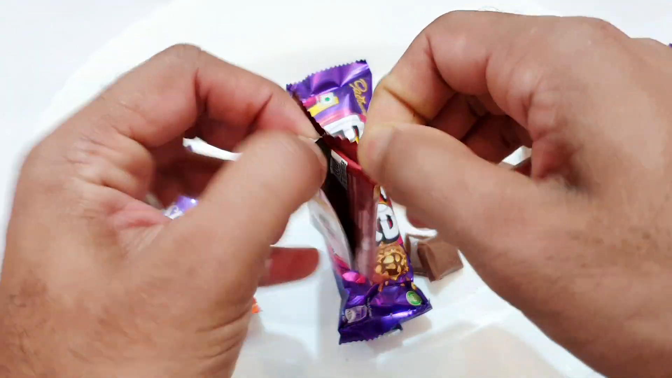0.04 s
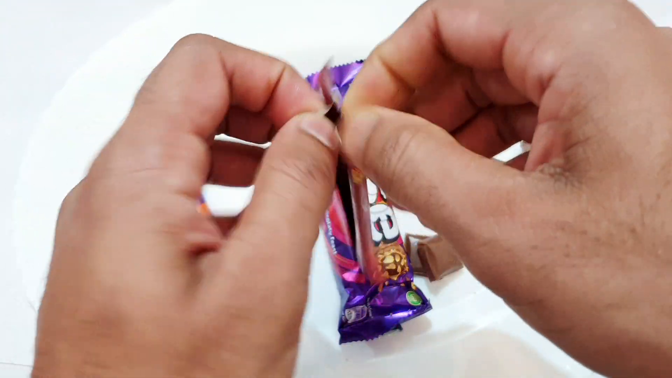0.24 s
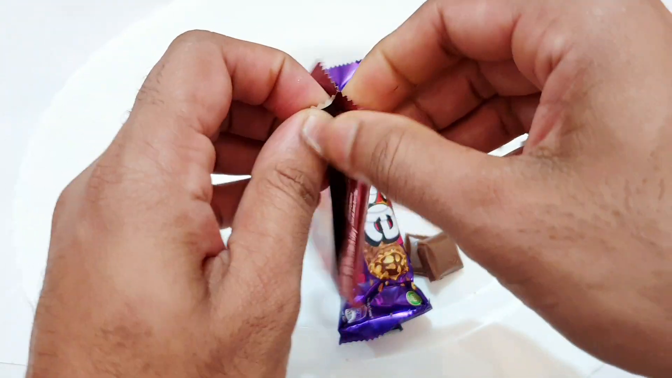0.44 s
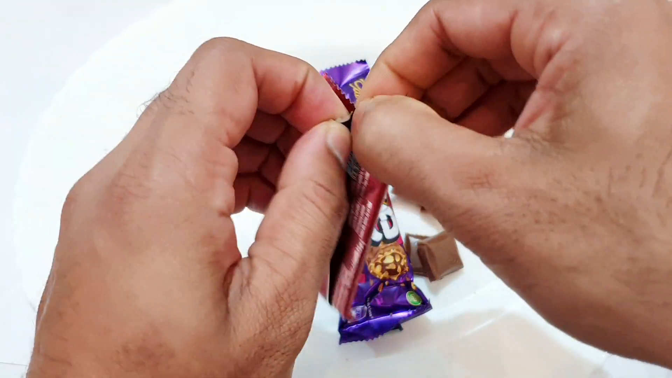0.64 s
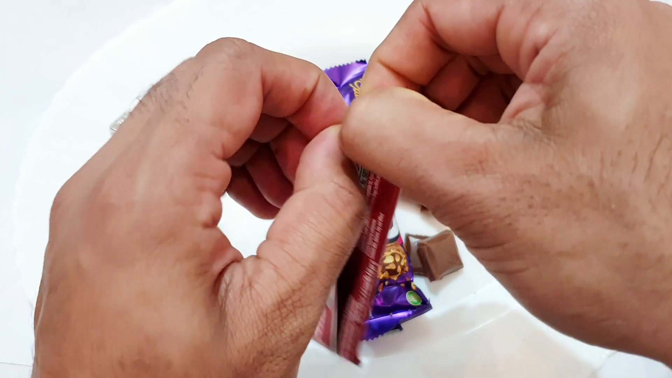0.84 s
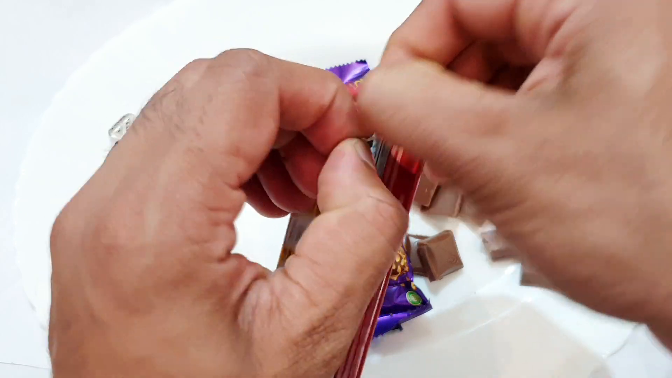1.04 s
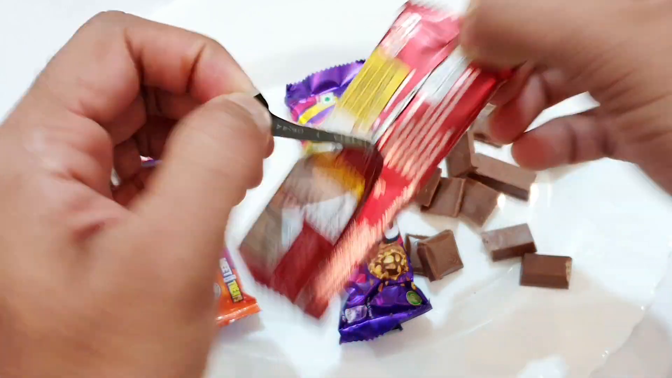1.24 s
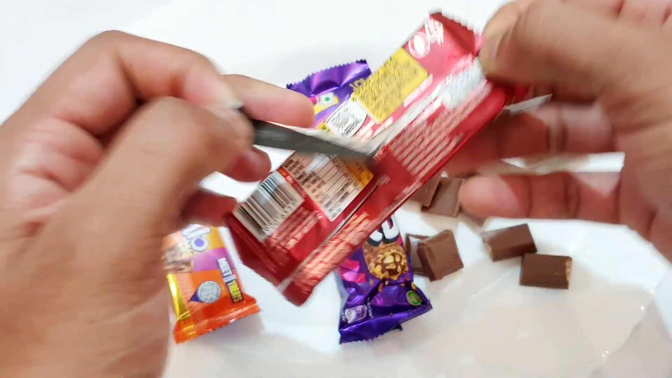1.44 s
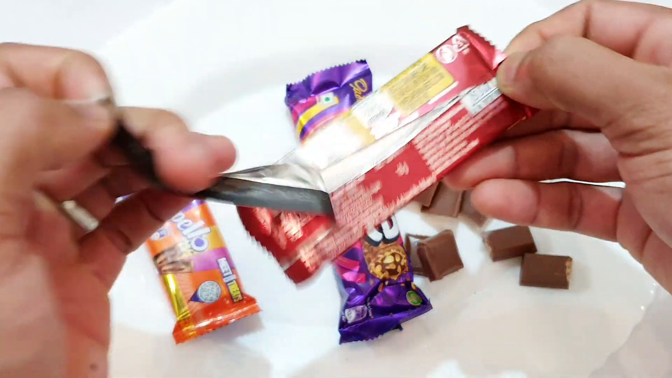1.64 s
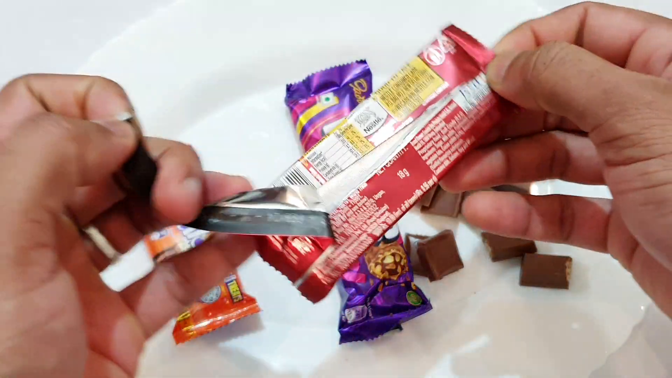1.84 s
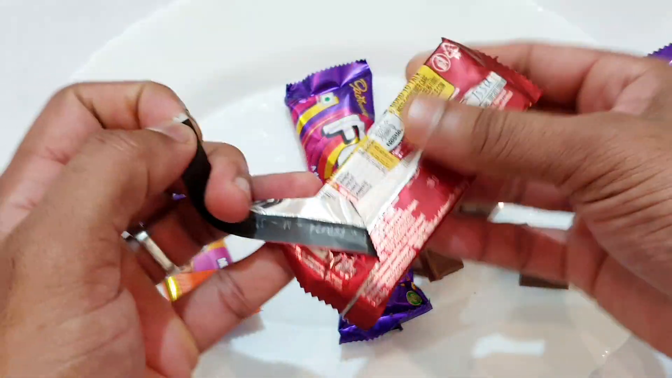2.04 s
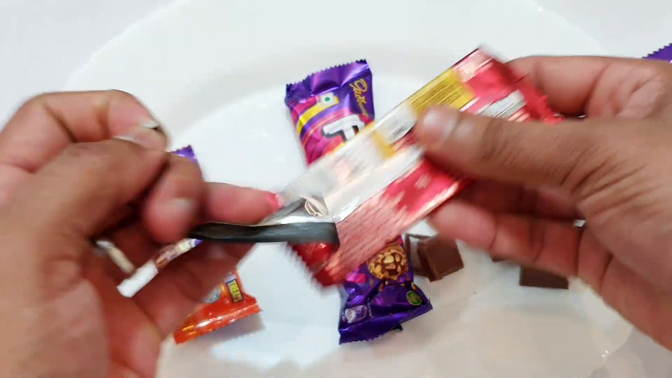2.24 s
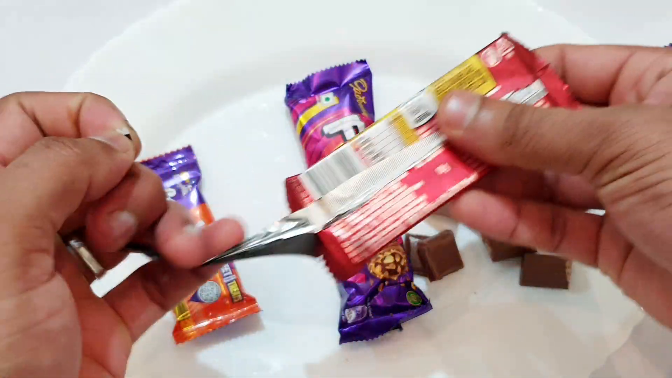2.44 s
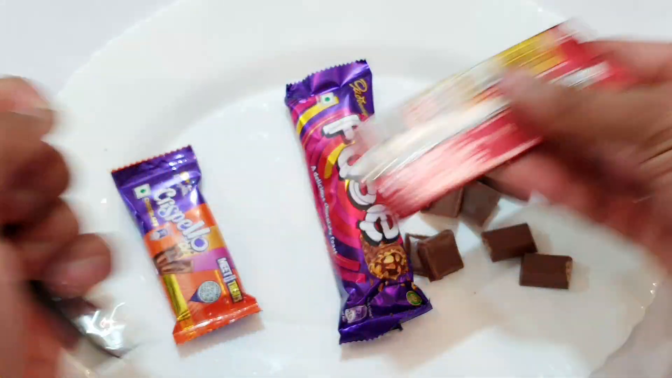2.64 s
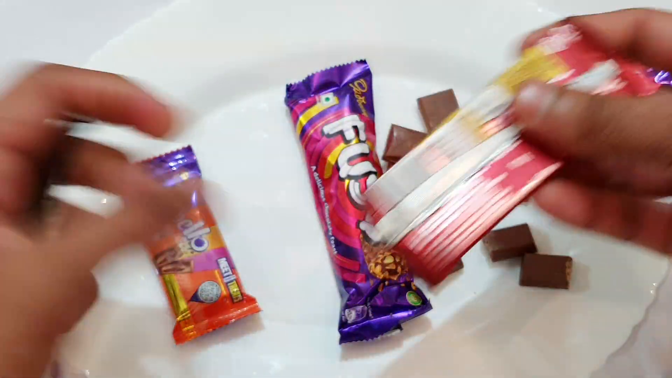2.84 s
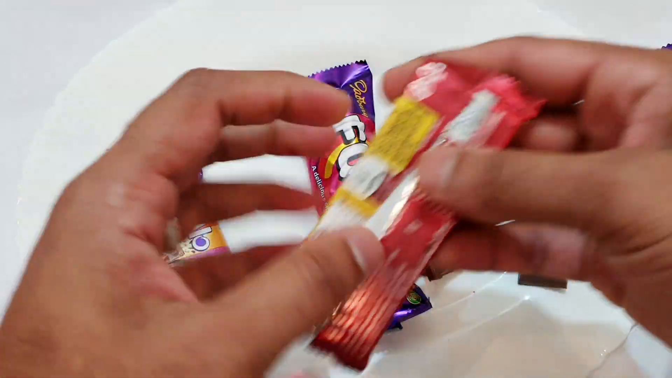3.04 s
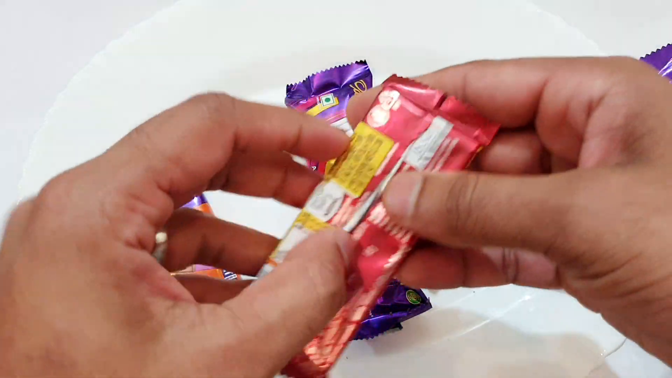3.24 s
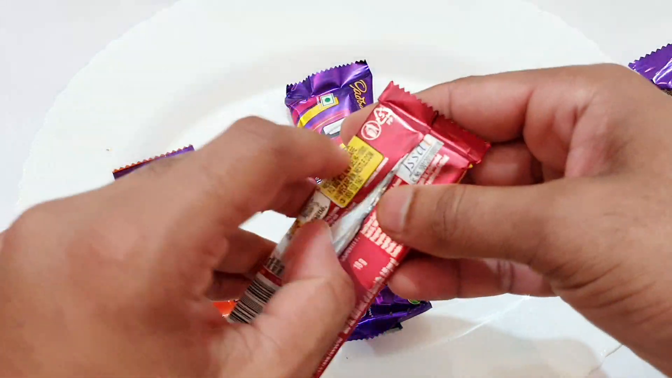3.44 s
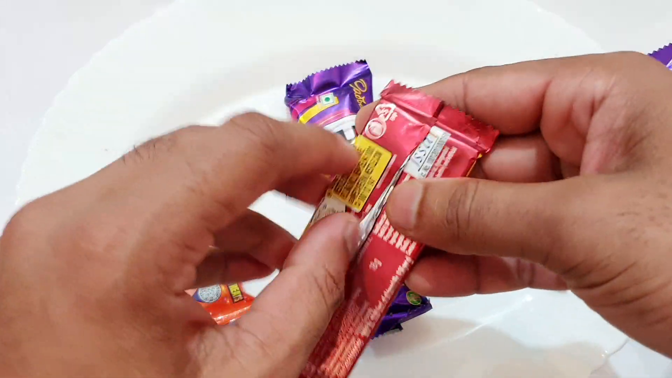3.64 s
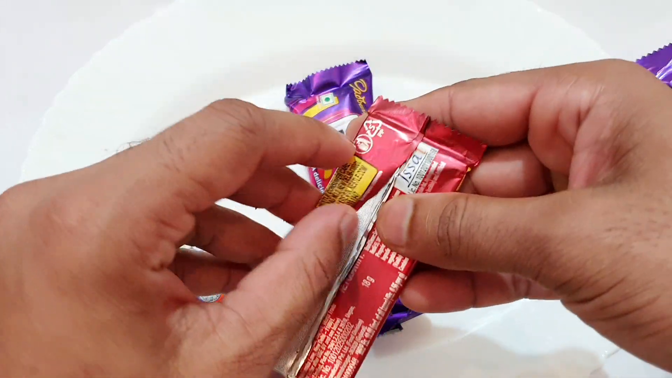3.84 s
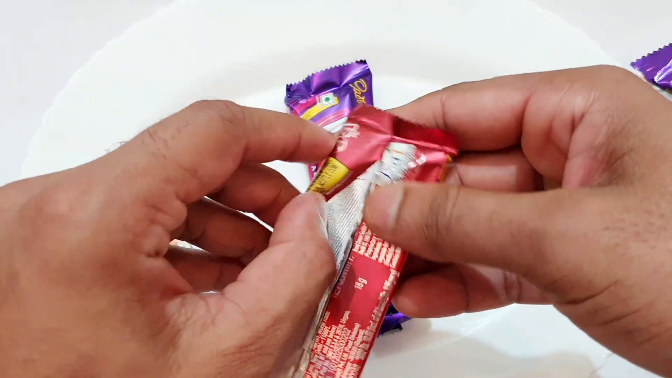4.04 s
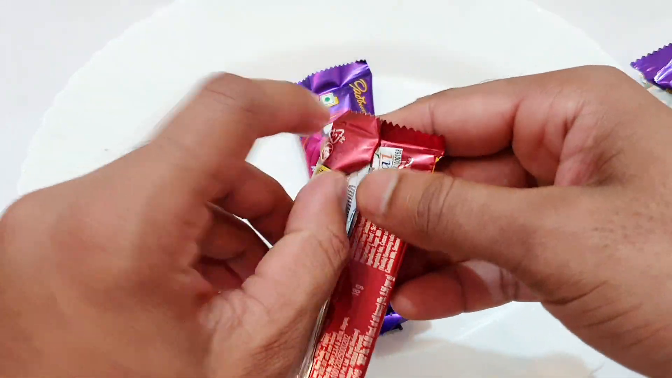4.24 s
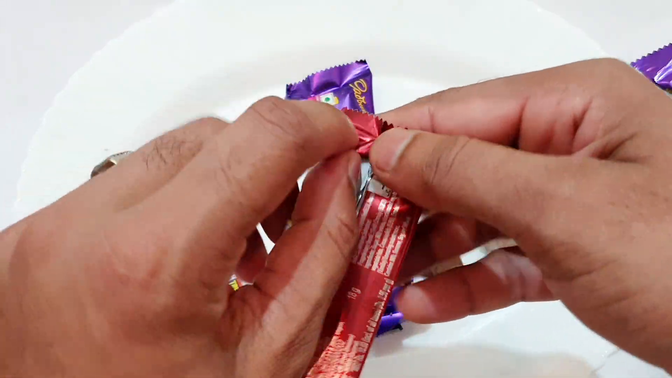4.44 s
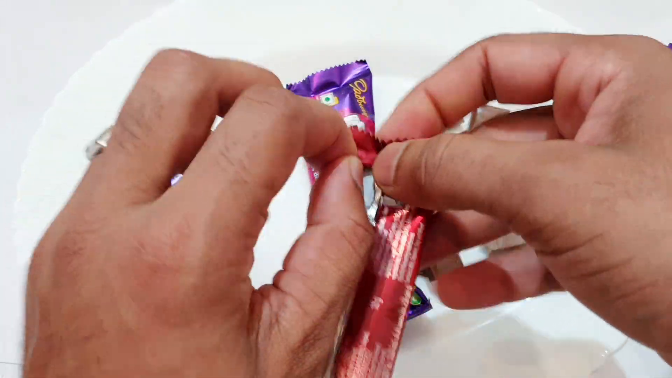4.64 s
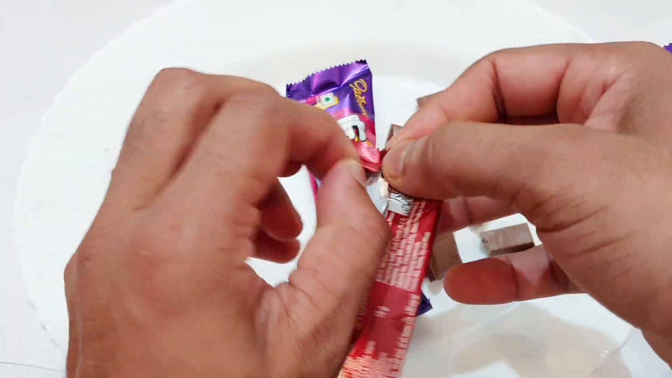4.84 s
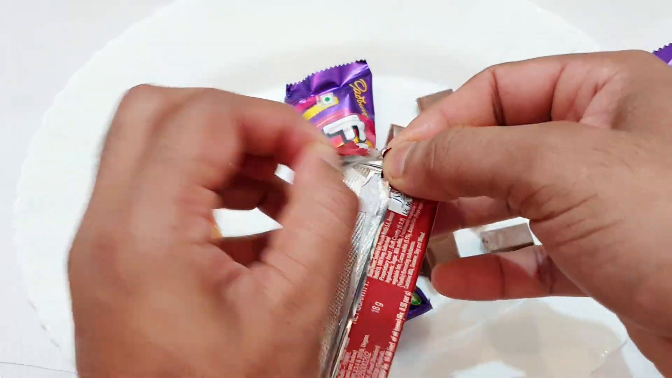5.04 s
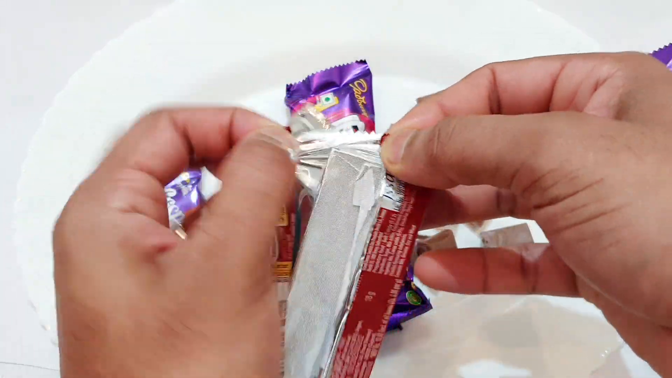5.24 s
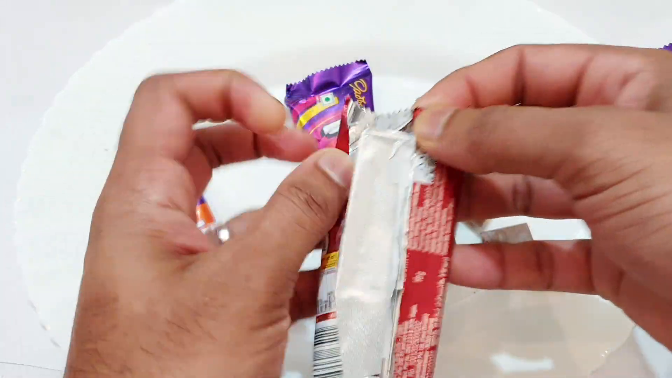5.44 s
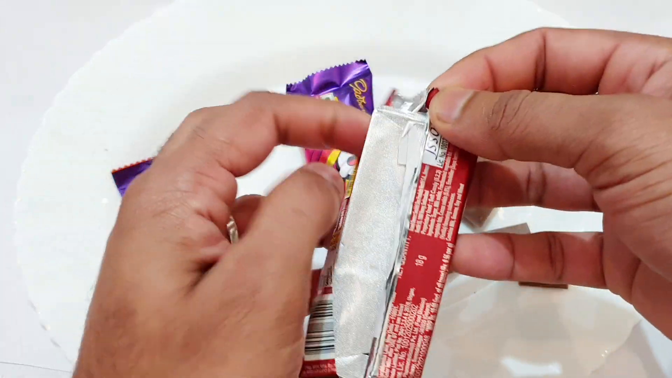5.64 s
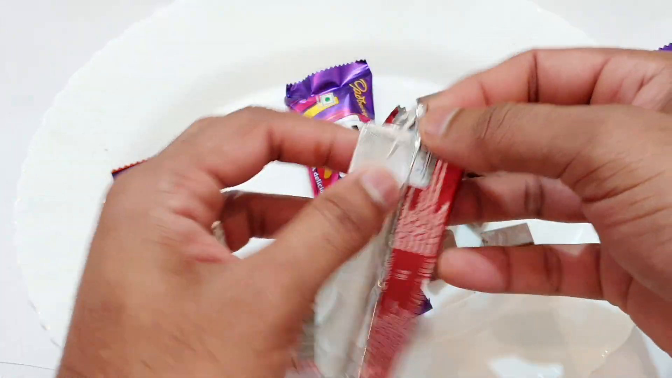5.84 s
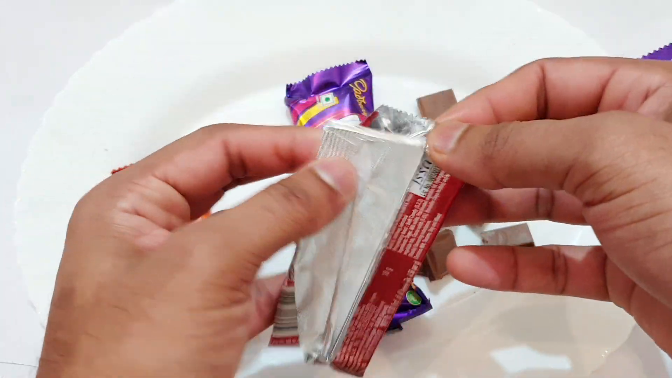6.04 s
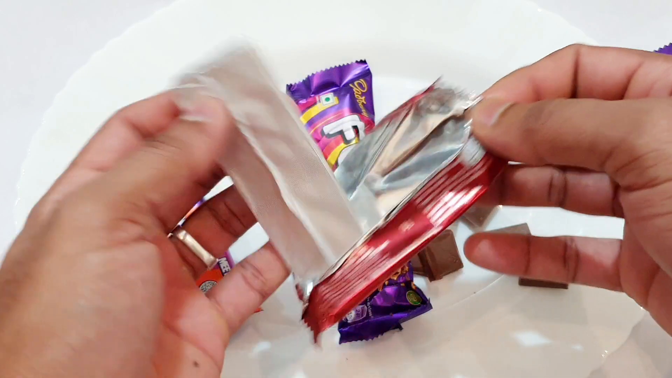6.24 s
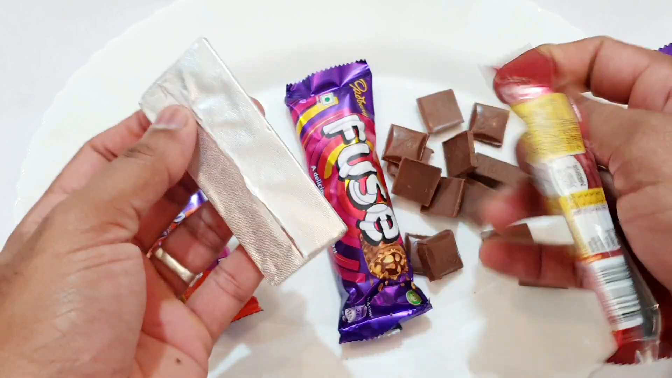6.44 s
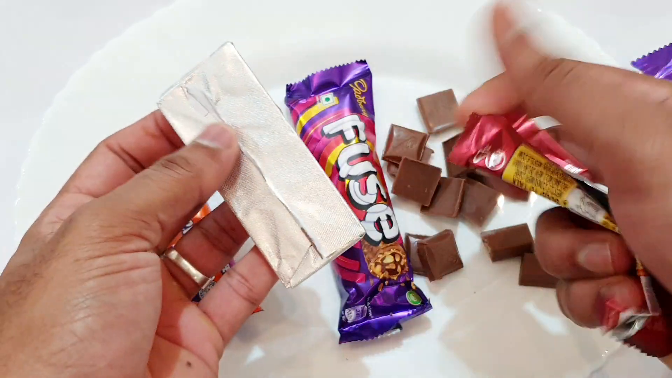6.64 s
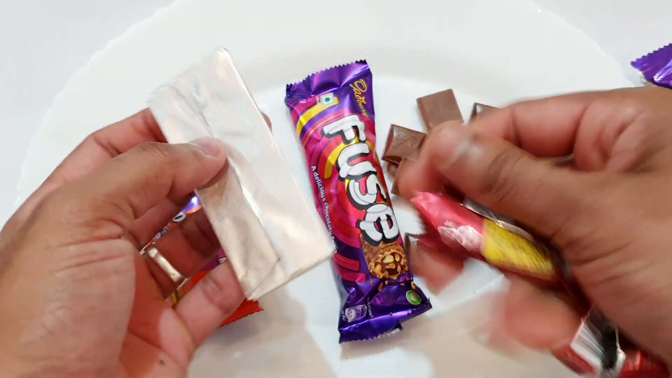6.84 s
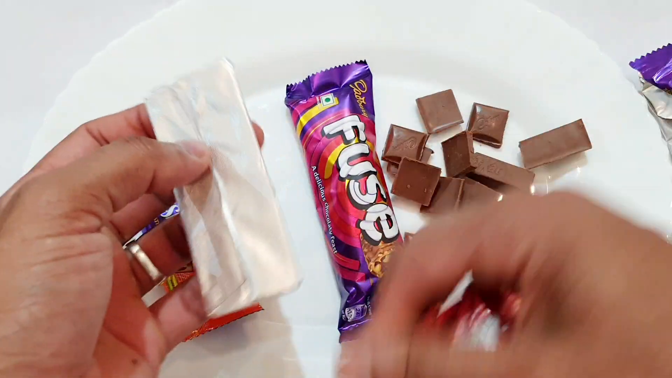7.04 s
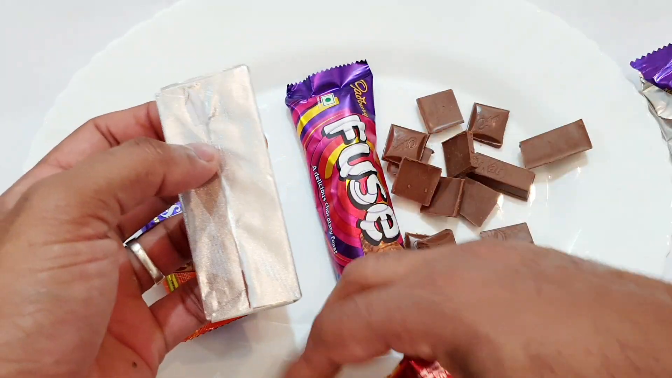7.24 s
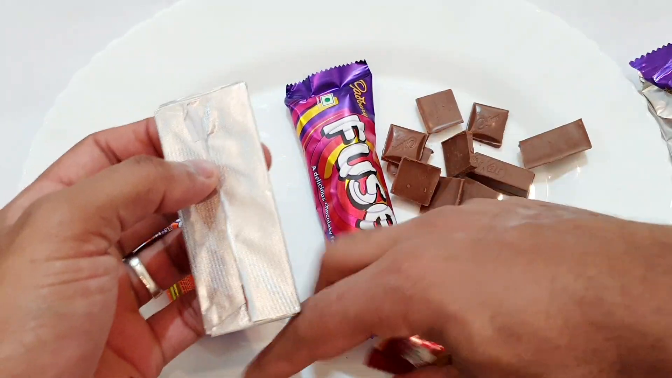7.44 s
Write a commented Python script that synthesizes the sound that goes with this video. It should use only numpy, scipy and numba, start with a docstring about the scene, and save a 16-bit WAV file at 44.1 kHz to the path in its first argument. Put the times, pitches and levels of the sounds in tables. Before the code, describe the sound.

Very close stereo phone pickup of hands opening a foil-lined sweet wrapper in a quiet small room. Light isolated ticks come first, then short bright rustles and a brisk crinkle around two seconds. After a thinner patch, harder snaps gather, with a sharp crack just past five seconds. The densest crumpling follows between six and seven, then only faint rustles remain over soft hum and hiss.

```python
"""Quiet room: fingers tear open and crumple a foil-lined sweet wrapper just below a two-microphone phone.
Creases snap as millisecond noise bursts over a rustle of tiny slips; both ring film, air pocket, facets, sheen.
Soft hand bumps are damped sines; a far bird's two whistles are gliding tones.
Hum and hiss are shaped noise, a passing rumble is low band noise; a noise tail gives the room."""
import sys
import numpy as np
from scipy import signal
from scipy.fft import rfft, irfft
from scipy.io import wavfile
from numba import njit

SR = 44100
rng = np.random.default_rng(int(sys.argv[2]) if len(sys.argv) > 2 else 0)


def waveform_to_disk(signal):
    """Save audio, clipped to [-1, 1], as 16-bit WAV at the path in sys.argv[1]."""
    frames = np.transpose(np.atleast_2d(signal))
    scaled = np.clip(frames, -1, 1) * 32767
    samples = np.round(scaled).astype(np.int16)
    wavfile.write(sys.argv[1], SR, samples)


N = 330750
T = np.arange(N) / SR  # [s]

# room hum and hiss, relative spectrum: (frequency [Hz], density [dB per Hz])
AIR_SPECTRUM = [(26, -40), (45, 4), (299, 1.5), (488, -2), (723, -5), (838, -8), (2470, -17), (7500, -19),
                (9500, -46), (16000, -52)]
# pulls, tears and slides of the fingers:
# (peak time [s], level [dB], rise [s], fall [s], pocket re rustle [dB], sheen re rustle [dB])
STROKES = [(.36, -74, 0.18, 0.99, -1, -21), (.8, -62, 0.18, 0.37, -15, -4),
           (1.006, -45, 0.01, 0.57, -12, -1.5), (1.089, -39, 0.1, 0.039, -9.5, -4),
           (1.345, -45, 0.027, 0.28, -8.5, -4), (1.42, -42.5, 0.14, 0.18, -9, -4),
           (1.485, -39, 0.11, 0.13, -12, -1), (1.54, -42, 0.23, 0.042, -15, -5),
           (1.8, -53.5, 0.15, 0.05, -7.5, -18), (1.886, -51.5, 0.086, 0.057, -8, -4),
           (2.08, -55, 0.47, 0.16, -7, -10), (2.172, -37.5, 0.083, 0.094, -4.5, 2),
           (2.389, -51, 0.016, .15, -6.5, 11.5), (2.472, -36.5, 0.046, 0.057, -2.5, -2.5),
           (2.69, -56, 0.11, 0.17, -20, -7), (2.92, -64, 0.12, 0.19, -5, -26),
           (3.05, -58, 0.12, 0.025, -3, -12), (3.18, -57, 0.15, 0.16, -10.5, -7),
           (3.307, -41, 0.019, 0.037, -10, -20), (3.412, -53, 0.034, 0.14, -17, -13),
           (3.727, -58, 0.043, 0.11, -11.5, -14), (3.876, -50, 0.09, 0.2, -19, -12),
           (4.115, -44.5, 0.051, .25, -14.5, -10), (4.325, -46, 0.071, .07, -18, -22),
           (4.445, -43.5, 0.067, 0.093, -14, -3), (4.73, -51, 0.32, 0.18, -31, -6),
           (4.964, -39, 0.076, 0.13, -9, -5), (5.15, -39.5, 0.044, 0.19, -8, -13),
           (5.313, -43.5, 0.068, 0.2, -5, -3.5), (5.61, -58.5, .3, 0.63, -40, -21),
           (5.82, -56, 0.43, .4, -8.5, -6.5), (5.97, -39, .08, 0.27, -2.5, -1),
           (6.21, -33.5, 0.049, 0.12, -6, -6), (6.41, -41.5, .3, 0.24, -10, -11),
           (6.49, -33, 0.084, 0.13, -11.5, -1), (6.6, -40.5, 0.1, 0.14, -7, -5),
           (6.69, -31, 0.096, 0.092, -10.5, -8), (6.85, -31, 0.27, 0.13, -12, -5.5),
           (7.09, -51, 0.22, 0.19, -6.5, -9.5), (7.39, -53, .13, .05, -11, -14),
           (7.49, -52, 0.1, .2, -5.5, -12)]
# creases that snap: (time [s], film [dB], pocket re film [dB], facets re film [dB])
SNAPS = [(0.0309, -36, -17, 9), (0.0972, -38, -6, -2.5), (.285, -66, -19, 12), (0.3875, -55.5, -16.5, 13.5),
         (.46, -55.5, -7, 18.5), (0.5197, -43, -23, -12), (0.6974, -48.5, -12, 14),
         (0.7513, -48.5, -25, 26), (0.8785, -50, -25, 2), (0.9057, -61, -9, 13), (0.9516, -53, -6, 16.5),
         (1.1793, -38, -18.5, 8), (1.228, -63, -25, 8), (1.279, -58.5, -20, 5.5), (1.3606, -45, -11, 13),
         (1.5712, -36, -30, 4.5), (1.6115, -41, -2, 9), (1.7033, -35, -17, 7.5), (1.784, -36, -22, -2),
         (1.792, -41, -22, 11.5), (1.8557, -45, 3, 9.5), (1.892, -39.5, 1.5, -1), (1.9226, -43, -9, 6.5),
         (2.1009, -50, 14, -2), (2.1387, -41.5, 8, 12.5), (2.183, -29, 0, 1.5), (2.205, -32, -3, 0),
         (2.2183, -34.5, 4, -2), (2.2716, -36.5, -3, 11.5), (2.388, -70, -8, 22), (2.4551, -35.5, 9.5, -10),
         (2.4605, -31, -5, -17), (2.4756, -29, -5, 2), (2.523, -38.5, -26, 11.5), (2.718, -62, -10, 14),
         (2.733, -59, -9, 14), (2.8589, -54, -24, 12.5), (2.9079, -43, 3.5, -13), (2.9868, -45.5, 1, -20),
         (3.0409, -40, -31, 2), (3.0471, -45.5, -15, 4), (3.178, -41, -18, 6.5), (3.1932, -50, -13, 8),
         (3.2893, -52, 16.5, -8), (3.312, -30.5, -7.5, 1), (3.515, -46, -7, 4.5), (3.759, -51.5, -10, -8),
         (3.9052, -31, -18, -18), (3.9702, -42.5, -23, 12), (4.118, -38.5, -2.5, 0), (4.1322, -43, -4, -14),
         (4.158, -35, -24, -11), (4.193, -37, -26, 3), (4.2182, -43.5, -1, 6), (4.2749, -24.5, -20.5, -1),
         (4.3165, -33, -8, -22), (4.3438, -38.5, -24, -17), (4.4028, -32.5, -26, 8.5),
         (4.4363, -27, -6.5, 0), (4.4497, -24.5, -12, -4.5), (4.5084, -37.5, -22, -1),
         (4.6048, -21, -6, -3), (4.622, -34.5, -30, 1), (4.8089, -28, -8.5, -5.5), (4.907, -39.5, -30, 2),
         (4.9195, -31, -11, 2.5), (4.948, -26, -29, -8), (4.9518, -28.5, -20, -5), (4.972, -35, 4.5, -10),
         (5.019, -44, 8, -11), (5.0896, -43, -7, 5), (5.1411, -16, -18, -6.5), (5.1445, -23.5, 0, 5),
         (5.1544, -22.5, -2.5, -13), (5.245, -33.5, -25, -4), (5.2956, -28.5, 4.5, -13),
         (5.3003, -22.5, -26, 1), (5.3076, -36, 6, 0), (5.3296, -25, 2, -1), (5.3954, -35.5, -8, 4),
         (5.506, -45, 5, 6), (5.517, -34.5, 3.5, 9), (5.5865, -39, -9, 11.5), (5.6128, -37, -28, 9),
         (5.7539, -46.5, -4, 6.5), (5.864, -46.5, -12, 10), (5.9074, -30, -2, 5), (5.938, -37, 0, -5),
         (5.9588, -22, -5, -8), (5.9765, -30, 0, 1.5), (6.0246, -33.5, 10.5, -9), (6.1126, -32, 0, -1),
         (6.144, -17.5, -4, -4), (6.2023, -23, 1, 0), (6.2103, -30, 1, -7), (6.2213, -19.5, -9, 1.5),
         (6.2537, -18.5, -5.5, -2.5), (6.3484, -30.5, -10, 4), (6.3929, -27, -11.5, -12),
         (6.4179, -31.5, 3.5, -9), (6.44, -27, -7, -4), (6.471, -34, 8, -11), (6.4793, -24, 0, -3),
         (6.4878, -18, -10, -9), (6.494, -24, -11, -4), (6.517, -31, -18, -8), (6.5508, -35, -24, 3),
         (6.575, -24.5, -21, 4.5), (6.583, -16.5, -30, -1), (6.6575, -23.5, -2, -1.5),
         (6.6807, -15.5, -16, -20), (6.6939, -31, -3, 7), (6.7111, -33, -3, 8), (6.7243, -26, -12, -12),
         (6.7525, -30, -11, 4), (6.7615, -23, -13, -1), (6.7656, -24.5, -7, 5), (6.8171, -15.5, -16, -14),
         (6.83, -23, -21, -4), (6.845, -36, -16, 5), (6.8592, -27, -23, -15), (6.887, -25, -14, -9),
         (6.8949, -27.5, -21, -5), (6.9064, -25, -5.5, -18), (6.9723, -32, -8.5, -11),
         (7.0267, -41.5, -0.5, 16), (7.0935, -31.5, -15, -2.5), (7.245, -49.5, 0.5, -30),
         (7.375, -52, -16, 6), (7.466, -50, -2, 6), (7.4714, -42.5, -2, -8)]
# wrapper film resonances: (centre [Hz], width per stage [Hz], level [dB])
FILM_MODES = [(1656, 390, 1.6), (2380, 960, 3.14), (3707, 1860, 4.17)]
# air pocket resonances: (centre [Hz], width per stage [Hz], level [dB])
POCKET_MODES = [(363, 294, -12.5), (699, 256, -1.2), (1181, 404, 3)]
# small-fold resonances: (centre [Hz], width per stage [Hz], level [dB])
FACET_MODES = [(4630, 1480, 3.1), (6790, 2660, 6.9), (8454, 1080, 1.6)]
# top-treble resonances: (centre [Hz], width per stage [Hz], level [dB])
SHEEN_MODES = [(12120, 11800, -0.019), (15230, 5200, -2.4)]
# room tail bands: (centre [Hz], t60 [s], level [dB])
ROOM_BANDS = [(973, 0.049, -30), (3280, 0.27, -21.5), (8830, 0.14, -19)]
# far whistles, one list of glide points per call: (time [s], pitch [Hz], level [dB])
WHISTLES = [
    [(.3, 5300, -84), (.5, 5020, -70), (.63, 5050, -66), (.72, 5060, -80)],
    [(3.5, 5170, -68), (3.68, 5050, -67.5), (3.84, 5140, -63), (3.9, 5100, -84)],
]
# hand bumps: (time [s], initial envelope [dB], pitch [Hz], 1/e decay [ms])
BUMPS = [(2.908, -46.5, 237, 9), (4.607, -11.5, 232, 0.25), (6.005, -47, 90, 16), (6.023, -41, 150, 5.7),
         (6.142, -24.5, 130, 1.1), (6.199, -32.5, 71.6, 7.3), (7.459, -54, 90.5, 34)]

AIR_DB = -62.5
RIGHT_LAG_SAMPLES = 4  # shared shaking reaches the right port later
STROKE_SPAN_DB = 20  # covered by each rise and fall time
# facets re film: the small folds fade as the wrapper opens out
FACETS_SHUT_DB, FACETS_DB_PER_S = 9.5, -2
# faint rub of merely holding it; pocket and sheen re rub
HOLD_DB, HOLD_POCKET_DB, HOLD_SHEEN_DB = -71, -13, -17
# rustle after a snap, re snap: film, pocket, facets, sheen
SETTLE_DB, SETTLE_T60_S = (-26.5, -31.5, -25, -26), 0.32
# sheen re film rises with the facets: crisp creases are crisp all the way up
SHEEN_DB, SHEEN_DB_PER_FACET_DB = -1.5, 0.55
# the rumble swells and fades once, as a bell curve
RUMBLE_PEAK_S, RUMBLE_SPREAD_S, RUMBLE_PEAK_DB = 3.75, 0.73, -72
RUMBLE_HZ, RUMBLE_WIDTH_HZ = 60.3, 26.0
TOP_HZ = 16000


def undb(db):
    """Decibels to amplitude ratio."""
    return 10 ** (np.asarray(db) / 20)


def level(x, db):
    """Scale to an rms level."""
    return x * undb(db) / np.sqrt(np.mean(x ** 2))


def walk(rate_hz):
    """Gaussian random knots joined by straight lines."""
    knots_s = np.arange(0, N / SR + 1, 1 / rate_hz)
    return np.interp(T, knots_s, rng.standard_normal(len(knots_s)))


def air():
    """Room hum and hiss: shaped noise, its bass more alike at both ports than its treble."""
    f_hz = np.fft.rfftfreq(N, 1 / SR) + 1  # +1 avoids log of 0
    hz, db = np.transpose(AIR_SPECTRUM)
    colour = undb(np.interp(np.log(f_hz), np.log(hz), db))
    mid, side = rfft(rng.standard_normal((2, N))) * colour
    side = side * np.interp(np.log(f_hz), np.log([200, 500]), [.55, 1.25])
    return level(irfft(np.array([mid + side, mid - side]), N), AIR_DB)


@njit
def svf(x, hz, width_hz):
    """State-variable band-pass with a moving centre, gain 1 there."""
    y, band, low = np.empty(len(x)), 0., 0.
    for i in range(len(x)):
        g = np.tan(np.pi * hz[i] / SR)
        k = width_hz / hz[i]
        v = (band + g * (x[i] - low)) / (1 + g * (g + k))
        band, low = 2 * v - band, low + 2 * g * v
        y[i] = k * v
    return y


def ring(x, modes, drift_hz=0., sway_db=0.):
    """Parallel two-stage resonances of alternating sign, wandering in pitch and strength.

    Scaled so that white noise about keeps its level before the sway."""
    out, power = 0, 0
    for k, (hz, width_hz, db) in enumerate(modes):
        centre_hz = hz + drift_hz * walk(12)[:x.shape[1]]
        gain = undb(db + sway_db * walk(25)[:x.shape[1]])
        width_hz = float(width_hz)
        mode = []
        for port in x:
            first = svf(gain * port + 1e-18, centre_hz, width_hz)  # offset keeps out denormals
            mode.append(svf(first, centre_hz, width_hz))
        out = out + (-1) ** k * np.array(mode)
        power = power + undb(db) ** 2 * np.pi / 2 * width_hz / SR
    return out / np.sqrt(power)


def ports(shared):
    """Random-sign shaking at both microphones: a shared part plus each one's own path around the hands."""
    common = rng.choice([-1., 1.], N)
    own = rng.choice([-1., 1.], (2, N))
    shared = np.clip(shared, 0, 1)  # power fraction
    both = np.array([common, np.roll(common, RIGHT_LAG_SAMPLES)])
    return np.sqrt(shared) * both + np.sqrt(1 - shared) * own


def wrapper(forces, sway_db):
    """One force envelope per part; resonances shift with the shape; the pocket is more alike at both ports."""
    fine, broad = ports(0.33), ports(0.56)
    shakes = fine, broad, fine, fine
    parts = FILM_MODES, POCKET_MODES, FACET_MODES, SHEEN_MODES
    out = 0
    for shake, force, modes in zip(shakes, forces, parts):
        drift_hz = 0. if modes is SHEEN_MODES else .045 * modes[-1][0]
        out = out + ring(shake * force, modes, drift_hz=drift_hz, sway_db=sway_db)
    return out


def burst(rise_ms, fall_ms):
    """Envelope of one buckling crease or slip, top 1."""
    t_ms = T[:1024] * 1000
    shape = (1 - np.exp(-t_ms / rise_ms)) * np.exp(-t_ms / fall_ms)
    return shape / shape.max()


def train(s, db):
    """One spike per event."""
    spikes = np.zeros(N)
    index = np.clip((s * SR).astype(int), 0, N - 1)
    np.add.at(spikes, index, undb(db))
    return spikes


def creases():
    """Times of the snaps and their levels on film, pocket, facets and sheen."""
    s, film_db, pocket_db, facets_db = np.transpose(SNAPS)
    sheen_db = SHEEN_DB + SHEEN_DB_PER_FACET_DB * facets_db
    return s, [film_db, film_db + pocket_db, film_db + facets_db, film_db + sheen_db]


def effort():
    """Rubbing force per part: strokes, settling after snaps and the steady hold add in power."""
    facets_db = FACETS_SHUT_DB + FACETS_DB_PER_S * T
    film_db = -10 * np.log10(1 + undb(facets_db) ** 2)  # film and facets share the power
    rub, pocket, sheen = (np.full(N, undb(HOLD_DB + db) ** 2) for db in (0, HOLD_POCKET_DB, HOLD_SHEEN_DB))
    for s, db, rise_s, fall_s, pocket_db, sheen_db in STROKES:
        spans = np.where(T < s, (s - T) / rise_s, (T - s) / fall_s)
        power = undb(db - STROKE_SPAN_DB * spans) ** 2
        rub = rub + power
        pocket = pocket + power * undb(pocket_db) ** 2
        sheen = sheen + power * undb(sheen_db) ** 2
    stroked = rub * undb(film_db) ** 2, pocket, rub * undb(film_db + facets_db) ** 2, sheen

    s, parts_db = creases()
    fade = 1000 ** (-2 * T[:SR // 2] / SETTLE_T60_S)  # power, hence the 2
    forces = []
    for power, db, settle_db in zip(stroked, parts_db, SETTLE_DB):
        settle = np.abs(signal.fftconvolve(train(s, 2 * (db + settle_db)), fade)[:N])
        forces.append(np.sqrt(power + settle))
    return forces


def rustle():
    """Small slips at random times, unequal in size and colour, over a rub; their strength flickers."""
    size = rng.exponential(size=3500)
    when_s = rng.random(len(size)) * N / SR
    forces = []
    for force in effort():
        slip_db = 4.4 * size + 6.3 * rng.standard_normal(len(size))  # each slip favours other parts
        spikes = train(when_s, np.minimum(slip_db, 16))
        slips = 2.8 + signal.fftconvolve(spikes, burst(0.048, 1.0))[:N]  # 2.8: steady rub
        flicker = undb(2.22 * walk(40))
        forces.append(force * flicker * slips / np.sqrt(np.mean(slips ** 2)))
    return wrapper(forces, sway_db=3.5)


def snaps():
    """Each crease lets go in a millisecond or two; film and pocket follow a little longer."""
    s, parts_db = creases()
    falls_ms = 1.94, 1.96, 1.8, 1.77
    forces = []
    for db, fall_ms in zip(parts_db, falls_ms):
        forces.append(signal.fftconvolve(train(s, db), burst(0.1, fall_ms))[:N])
    return wrapper(forces, sway_db=1.0)


def room(x):
    """Diffuse tail: decaying noise, band by band, different at each port."""
    t, tail = T[:SR // 2], 0
    for hz, t60_s, db in ROOM_BANDS:
        noise = ring(rng.standard_normal((2, len(t))), [(hz, .8 * hz, 0)])
        band = noise * 1000 ** (-t / t60_s) * (t > .004)  # starts after 4 ms
        tail = tail + undb(db) * band / np.sqrt(np.sum(band ** 2) / 2)
    return signal.fftconvolve(x, tail, axes=1)[:, :N]


def whistles():
    """Thin gliding tones from outdoors, unsteady in pitch and strength."""
    out = np.zeros((2, N))
    for call in WHISTLES:
        s, hz, db = np.transpose(call)
        pitch_hz = np.interp(T, s, hz) + 14 * walk(56)
        phase = 2 * np.pi * np.cumsum(pitch_hz) / SR
        loud = undb(np.interp(T, s, db, -200, -200) + 3 * walk(22))
        port_phase = np.array([[0], [1.6]])  # rad
        out += np.sqrt(2) * loud * np.sin(phase + port_phase)
    return out


def rumble():
    """Low band noise from outside, alike at both ports."""
    low = svf(rng.standard_normal(N), np.full(N, 1. * RUMBLE_HZ), RUMBLE_WIDTH_HZ)
    swell = np.exp(-.5 * ((T - RUMBLE_PEAK_S) / RUMBLE_SPREAD_S) ** 2)
    return level(low, RUMBLE_PEAK_DB) * swell


def bumps():
    """Soft thuds of the hands: quickly damped sines, alike at both ports."""
    out = np.zeros(N)
    for s, db, hz, decay_ms in BUMPS:
        t = np.clip(T - s, 0, 1)
        out += undb(db) * np.sin(2 * np.pi * hz * t) * np.exp(-1000 * t / decay_ms)
    return out


def scene():
    """Wrapper with its room tail, plus all other sources."""
    hands = snaps() + rustle()
    return hands + room(hands) + bumps() + whistles() + air() + rumble()


def record(dry):
    """The left port is quieter, most in the top treble; the phone cuts the deep bass and the top."""
    treble = signal.sosfilt(signal.butter(2, 9000, "high", fs=SR, output="sos"), dry)
    tilted = dry * undb(np.array([[-1.1], [.9]])) + treble * np.array([[-.25], [.25]])
    firm = signal.sosfilt(signal.butter(2, 48, "high", fs=SR, output="sos"), tilted)
    return signal.sosfilt(signal.ellip(8, .2, 70, TOP_HZ, fs=SR, output="sos"), firm)


dry = scene()
out = record(dry)
waveform_to_disk(out)
```